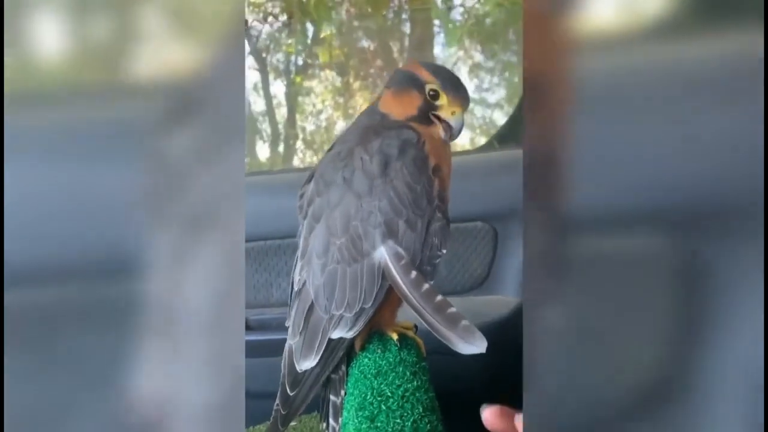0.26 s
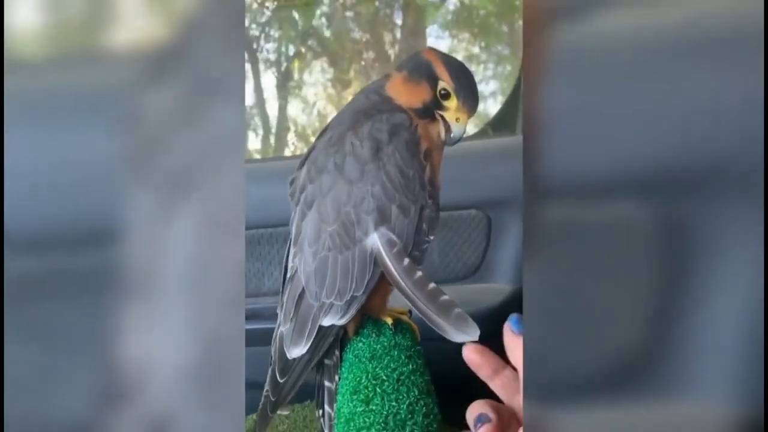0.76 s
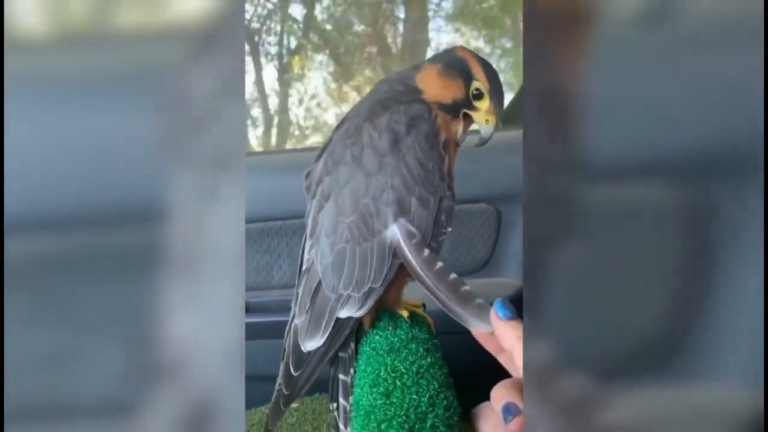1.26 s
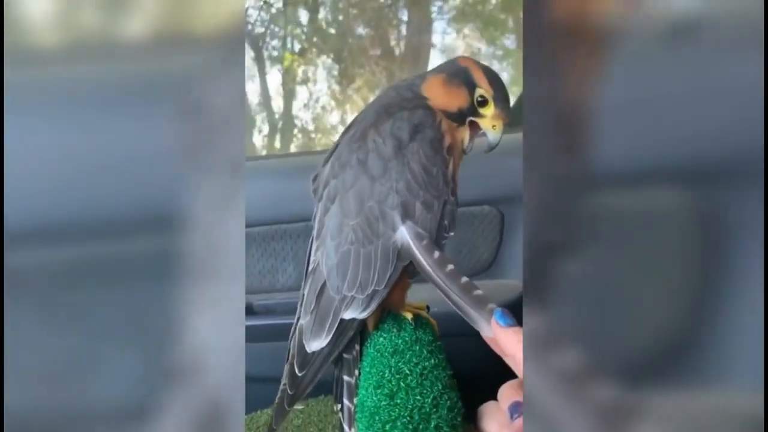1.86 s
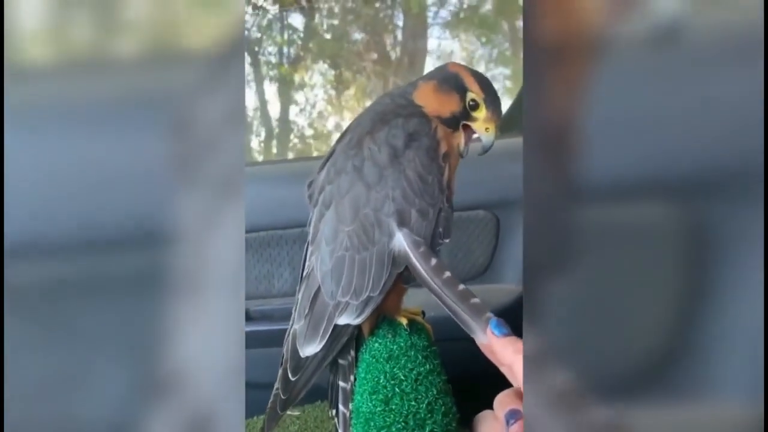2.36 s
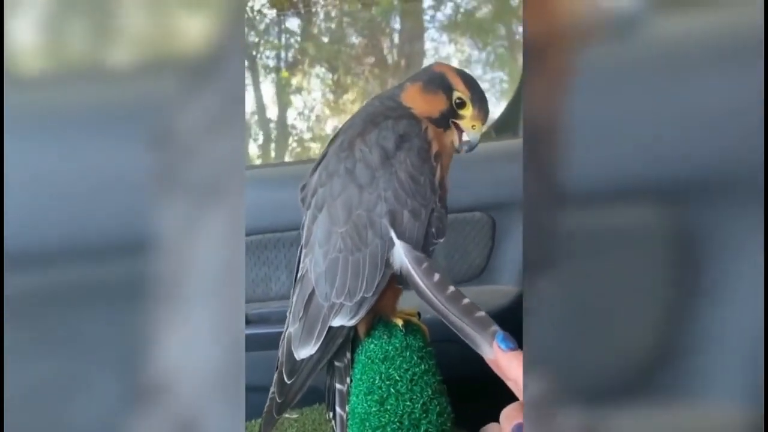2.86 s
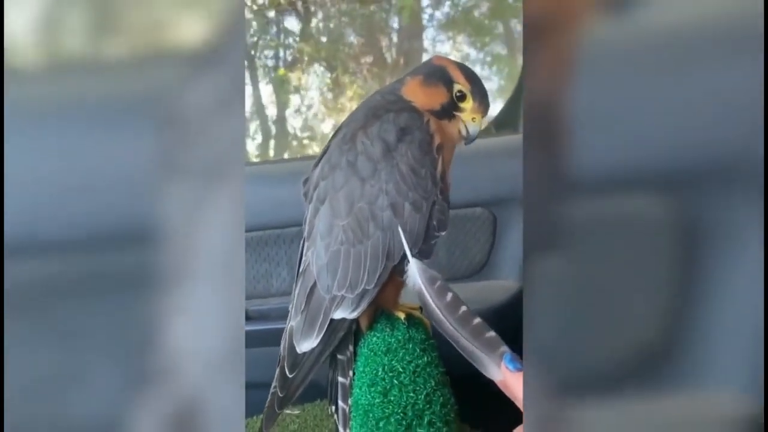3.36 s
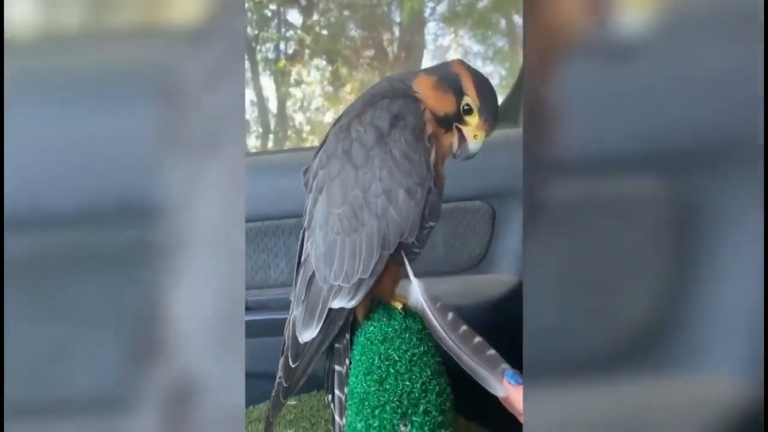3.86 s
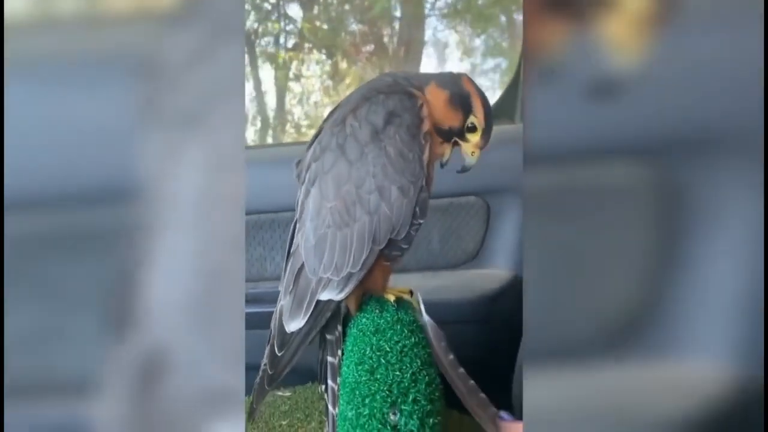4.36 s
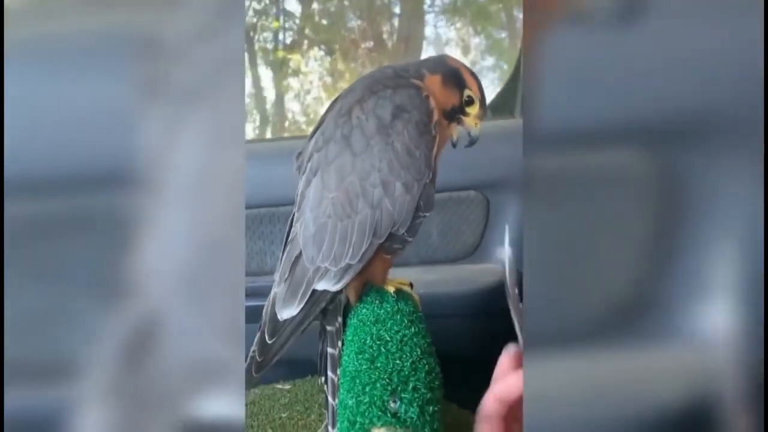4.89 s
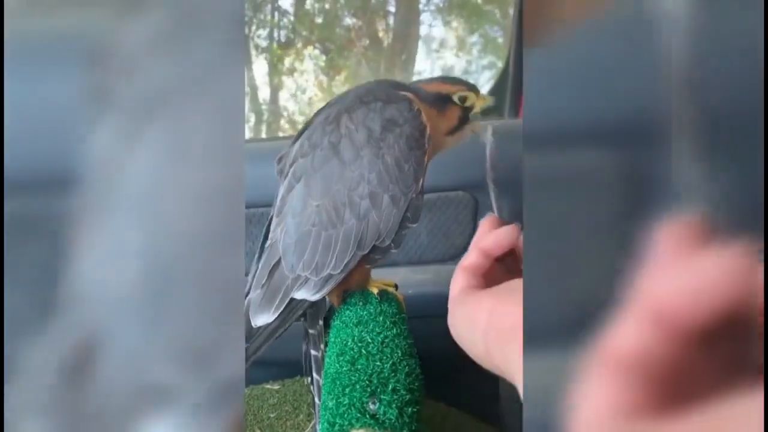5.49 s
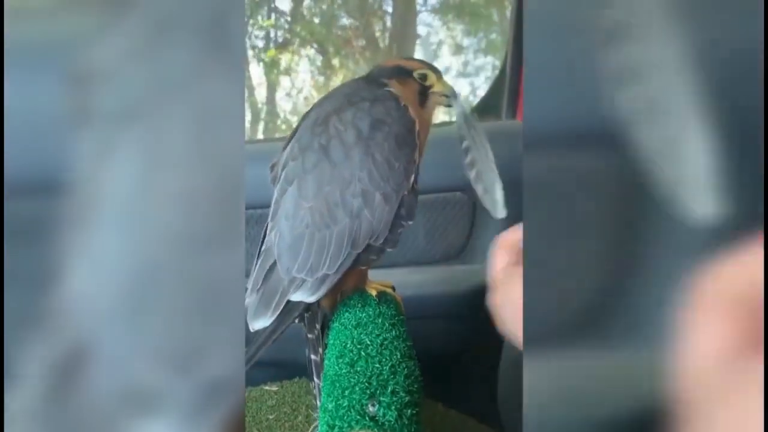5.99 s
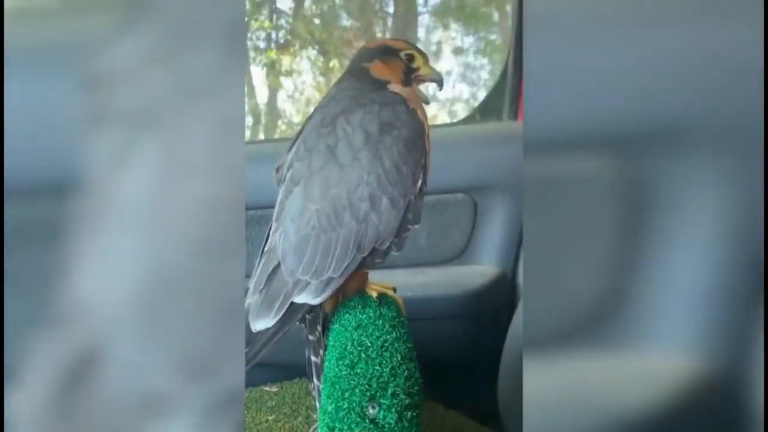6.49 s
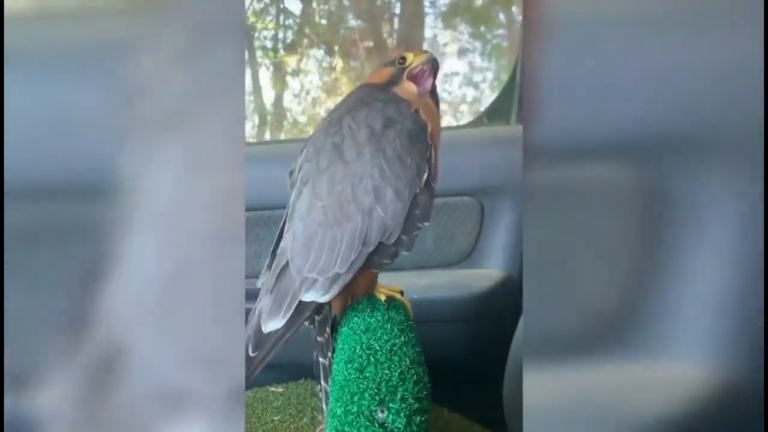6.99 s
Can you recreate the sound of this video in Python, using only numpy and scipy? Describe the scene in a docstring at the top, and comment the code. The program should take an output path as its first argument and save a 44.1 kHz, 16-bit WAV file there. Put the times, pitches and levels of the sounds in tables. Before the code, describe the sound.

A begging falcon's thin, piercing cries repeat at short intervals, each broken into quick swooping quavers. The sequence opens mid-call, with a barely audible thin whistle as that call stops, then little chirps lead into rising wails. Dull bumps sound occasionally. The close handheld phone pickup is direct and dry, with short reflections from glass and trim, and very quiet cabin rumble underneath. The last cry is strong.

```python
"""A small falcon begs close by in twelve wails: harmonic stacks on an arch of pitch, cut into swoops by catches.
Most calls follow a tiny chirp and grow louder; some break into a rasp of noise-modulated harmonics.
The bird sits on a perch inside a parked car: its voice arrives directly, off glass and off trim.
Soft knocks ring as decaying modes over a wavering low drone and a faint hiss of shaped noise.
A thin, steady-level whistle sounds once as the first call ends."""
import sys
import numpy as np
from scipy import signal
from scipy.fft import rfft, irfft
from scipy.io import wavfile
from scipy.ndimage import uniform_filter1d

SR = 44100
rng = np.random.default_rng(int(sys.argv[2]) if len(sys.argv) > 2 else 0)


def transcribe(signal):
    """Save signal, clipped to [-1, 1], as a 16-bit WAV file at the path in sys.argv[1]."""
    frames = np.atleast_2d(signal).T
    limited = np.clip(frames, -1, 1)
    pcm = np.round(limited * 32767).astype(np.int16)
    wavfile.write(sys.argv[1], SR, pcm)


N = 319310
TIME, FREQ = np.arange(N) / SR, np.arange(N // 2 + 1) * SR / N

# Harmonics 1 to 9 of the voice, before the resonances: level_db, share_of_brightness, share_of_gape
HARMONICS = [(-11, -1.04, 0.2), (-7, -1.335, 2), (-9.5, -0.92, 0.94), (-11.5, -0.22, 0.44),
             (-10, 0.17, 0.39), (-7.5, -0.21, -0.55), (-11.5, 0.29, 0.11), (-3.5, 0.5, -0.14),
             (-5.5, -.2, -.3)]


def undb(db):
    """Amplitude ratio: a gain of ten for every 20 decibels."""
    return 10 ** (np.asarray(db) / 20)


def unit(x):
    """Power normalization: scale to rms 1."""
    return x / np.sqrt(np.mean(x ** 2))


def wander(hz):
    """Band-limited random modulation: smoothed noise of spread 1, no faster than about hz."""
    step = int(SR / (2 * hz))
    held = np.repeat(rng.standard_normal(N)[:N // step + 1], step)
    ramped = uniform_filter1d(held, step)
    smooth = uniform_filter1d(ramped, step // 2 + 1)
    return unit(smooth[:N])


def ease(x):
    """Raised-cosine transition: a smooth step from 0 to 1 avoids clicks."""
    return np.sin(np.pi / 2 * np.clip(x, 0, 1)) ** 2


def harmonic_stack(hz, gains):
    """Fourier synthesis: harmonics of one pitch share a phase, each with its own rms gain."""
    phase = 2 * np.pi * np.cumsum(hz) / SR
    return np.sqrt(2) * sum(gain * np.sin((k + 1) * phase) for k, gain in enumerate(gains))


def reflections(t60):
    """Exponential reverberant decay: spectrum of a dense, fading train of echoes with energy 1."""
    decay = np.exp(-np.log(1000) * np.minimum(TIME / t60, 10))
    echoes = unit(rng.standard_normal(N) * decay)
    return rfft(echoes) / np.sqrt(N)


def cabin(drift=.04, swell=0.6, side_hz=3500):
    """Frequency modulation and noise filtering: a wavering drone, and a hiss that swells with it."""
    # Level of the drone over time: time_s, level_db
    drone_levels = [(0.0, -42.5), (0.4, -47), (0.84, -55.5), (0.88, -50), (1.12, -62), (1.38, -52.5),
                    (2.12, -58.5), (2.24, -53), (2.6, -58.5), (3.16, -57), (3.26, -62.5), (3.36, -56.5),
                    (3.6, -63), (4.02, -44.5), (4.54, -62), (4.98, -50), (5.48, -53), (7.2, -50.0)]
    # Relative spectrum of the hiss: frequency_hz, density_db (per Hz)
    air_spectrum = [(25, -34.5), (50, -8.5), (90, 6), (140, -16), (300, -19.5), (440, -7.5), (530, -22.5),
                    (620, -10.5), (1000, -24), (2500, -31.5), (5000, -38.5), (8200, -23), (10000, -29.5),
                    (13000, -30)]
    drone_hz, mean_air_db = 49.7, -57
    db = np.interp(TIME, *np.transpose(drone_levels))
    unsteady_db = 2.2 * wander(6)
    drone_pitch = drone_hz * (1 + drift * wander(3.3))
    drone = harmonic_stack(drone_pitch, [undb(db + unsteady_db)])

    hz, density_db = np.transpose(air_spectrum)
    colour = undb(np.interp(np.log(FREQ + 1), np.log(hz), density_db)) * ease(FREQ / hz[0])
    mid, side = rfft(rng.standard_normal((2, N))) * colour
    # the hiss's side part shrinks below side_hz, so its bass is nearly the same on both sides
    side = side * np.minimum(FREQ / side_hz, 1) ** 2
    air = unit(irfft(np.array([mid + side, mid - side]), N))
    return drone + air * undb(mean_air_db + swell * (db - db.mean()))


def whistle(centre_s=0.178, length_s=0.21, hz=4100, db=-72):
    """Pure-tone radiation: one faint sinusoid of slightly unsteady pitch, as the first call ends."""
    envelope = ease(2 - 4 * np.abs(TIME - centre_s) / length_s)
    return harmonic_stack(hz * (1 + .006 * wander(120)), [undb(db) * envelope])


def knocks(contact_s=0.012, damp_hz=560):
    """Modal impact response: padded blows give a brief thud, then the cabin's decaying boom."""
    # Soft knocks: time_s, peak_db
    knock_events = [(0.854, -46.5), (0.915, -52), (0.958, -47.5), (1.439, -47.5), (1.61, -29), (2.865, -43),
                    (2.881, -29), (3.11, -50), (3.758, -42), (3.791, -28), (3.812, -15), (5.507, -40.5),
                    (5.757, -37), (5.842, -39.5), (6.02, -43.5), (6.472, -40.5), (6.887, -40)]
    # Modes excited by a blow, relative levels before damping: frequency_hz, level_db, t60_s
    thud_modes = [(67, -12.5, 0.19), (137.2, 5.5, 0.031), (296.5, 4.5, 0.029), (396.6, 7, 0.032)]
    blows, t = np.zeros(N), TIME[:SR // 2]
    for s, db in knock_events:
        blows[int(s * SR)] += undb(db)
    ring = np.zeros(len(t))
    for hz, db, t60 in thud_modes:
        decay = np.exp(-np.log(1000) * t / t60)
        ring += undb(db) * np.sin(2 * np.pi * hz * t) * decay
    # a padded contact starts gradually and passes little treble
    padding = signal.butter(6, damp_hz, fs=SR, output="sos")
    ring = signal.sosfilt(padding, ring * ease(t / contact_s))
    return signal.fftconvolve(blows, ring / np.abs(ring).max())[:N]


def chirps(start_hz=1390, rise=0.076, length_s=0.042, fall_db=-7):
    """Spectral decay in a rising squeak: a bright, scratchy start leaves the lowest harmonics dominant."""
    # Chirps before calls, levels before envelope and resonances: start_s, treble_db, body_db, bright_s
    chirp_events = [(0.345, -41, -69, 0.0083), (1.032, -48, -66, 0.004), (1.637, -44.5, -56.5, 0.0037),
                    (2.285, -52.5, -56, 0.004), (2.932, -55.5, -62, 0.0059), (3.604, -56, -70, 0.0082),
                    (4.306, -50.5, -64, 0.018), (4.984, -55, -52, 0.015), (6.246, -61.5, -64.5, 0.014),
                    (6.89, -58, -48.5, 0.014)]
    out, scatter = np.zeros(N), .03 * wander(1100)
    for s, treble_db, body_db, bright_s in chirp_events:
        span = (TIME > s) & (TIME < s + length_s)
        t = TIME[span] - s
        body = undb(body_db) * np.sin(np.pi * t / length_s) * np.exp(-t / length_s)
        spark = t / bright_s * np.exp(1 - (t / bright_s) ** 2)
        gains = []
        for k, (level_db, *_) in enumerate(HARMONICS):
            gains.append(body * undb(fall_db * k) + spark * undb(treble_db + level_db))
        pitch = start_hz * (1 + rise * t / length_s + (spark + .1) * scatter[span])
        out[span] += harmonic_stack(pitch, gains)
    return out


def gesture(call, t):
    """Coupled vocal control: effort moves level, brightness and gape along an arch broken by catches.

    Returns pitch in Hz, level, brightness and gape in dB, and the release from 0 to 1.
    """
    # The voice catches, then swoops up again; accent and extra gape belong to the next swoop:
    # time_s, pitch_drop_hz, accent_db, extra_gape_db
    catch_events = [(0.019, 64, 3.5, -0.5), (0.094, 47, 7.5, -4.5), (0.499, 8, 8, 5.5),
                    (0.624, 82, -1, 1.5), (0.7, 84, -3.5, 2), (1.172, 36, 2, -6.5), (1.242, 56, 2, -6.5),
                    (1.322, 55, -2, 0), (1.782, 48, -5, -1), (1.855, 44, -3, -5), (1.925, 43, -4, -6.5),
                    (2.423, 28, -2, -0.5), (2.496, 69, 2.5, -7.5), (2.573, 52, -0.5, -2),
                    (3.066, 30, 4, -1.5), (3.146, 68, 4, -0.5), (3.223, 84, -4.5, 2.5),
                    (3.817, 18, -1, 2.5), (3.888, 76, -2.5, 3), (3.981, 65, -8, 0.5), (4.443, 25, 3, -7),
                    (4.507, 14, 6, -6.5), (4.578, 34, 3.5, -1), (4.67, 50, -1, -2.5), (5.11, 32, -0.5, 0),
                    (5.187, 74, 0.5, 0.5), (5.27, 87, 0.5, -0.5), (5.348, 94, 2.5, -3),
                    (5.668, 128, 3.5, 1), (5.756, 39, 6, 3), (5.836, 61, 1.5, 3), (5.909, 33, -5.5, 0.5),
                    (5.988, 92, -10, -0.5), (6.386, 28, 3.5, -6), (6.45, 69, 0.5, -9.5),
                    (6.526, 53, 1, -10), (7.043, 59, 2.5, -4), (7.108, 67, -2.5, -6.5),
                    (7.19, 37, -3.5, -6)]
    catch_s, catch_db_per_hz = .017, 0.0837  # half length; a deeper catch weakens the voice more
    onset_s, onset_db, scoop = 0.033, 5, 0.0339  # starts soft, and flat by this share of the pitch
    release_s, release_db, sag = 0.0571, 37, .09  # dies away and sags by this share as the air runs out
    bright_per_db, gape_per_db = 0.8818, 0.263  # effort brightens the voice and opens the beak
    slew_s = 0.022  # time to go from one swoop's accent to the next

    start, end, hz0, hz_mid, hz1, db0, db1, bright0, bright1, gape0, gape1, _ = call
    along = np.clip((t - start) / (end - start), 0, 1)
    onset = np.exp(-np.maximum(t - start, 0) / onset_s)
    ending = ease(1 - (end - t) / release_s)
    drop, accent, wider = np.zeros((3, len(t)))
    for s, drop_hz, accent_db, gape_db in catch_events:
        if start < s < end:
            after = ease((t - s) / slew_s + .5)
            drop = drop + drop_hz * np.exp(-((t - s) / catch_s) ** 2)
            accent = accent + after * (accent_db - accent)
            wider = wider + after * (gape_db - wider)
    arch = np.polyval(np.polyfit([0, .5, 1], [hz0, hz_mid, hz1], 2), along)
    effort = accent - catch_db_per_hz * drop - onset_db * onset - release_db * ending ** 2
    pitch = arch * (1 - scoop * onset - sag * ending) - drop
    level = db0 + (db1 - db0) * along + effort
    bright = bright0 + (bright1 - bright0) * along + bright_per_db * effort
    gape = gape0 + (gape1 - gape0) * along + gape_per_db * effort + wider
    return pitch, level, bright, gape, ending


def calls(flutter_db=2.0, swell_db=2.0):
    """Frequency and amplitude modulation of harmonics: wails fray as pitch sags and the air runs out."""
    # Calls, each along an arch of pitch; levels are before effort, harmonic levels and resonances:
    # start_s, end_s, start_pitch_hz, middle_pitch_hz, end_pitch_hz, start_level_db, end_level_db,
    # start_brightness_db, end_brightness_db, start_gape_db, end_gape_db, third_harmonic_ring_db
    call_events = [(0, 0.127, 1620, 1602, 1653, -32, -43, -4, -6, -1, 8.5, -4),
                   (0.435, 0.806, 1563, 1621, 1602, -53.5, -23.5, -7.5, 22.5, 2, 1, -5.5),
                   (1.118, 1.428, 1515, 1580, 1575, -52.5, -29.5, -2, 9, -8.5, 4, 3),
                   (1.718, 2.038, 1549, 1595, 1642, -41.5, -25.5, 1, 23, -2, 8, 2),
                   (2.343, 2.692, 1551, 1632, 1667, -45, -30.5, 2.5, 19.5, -2, 0.5, 1),
                   (3.005, 3.335, 1546, 1640, 1627, -55, -27, -1.5, 25.5, -3, -2.5, -0.5),
                   (3.666, 4.09, 1597, 1592, 1537, -47, -18, 8, 16.5, -14.5, 7, 9),
                   (4.356, 4.769, 1509, 1650, 1675, -54.5, -25.5, -5, 15.5, -5, -4, -2),
                   (5.037, 5.456, 1650, 1689, 1698, -49.5, -34, -3.5, 10.5, -2.5, 8, 9),
                   (5.612, 6.043, 1338, 1517, 1538, -52.5, -23.5, -10, 18.5, -6.5, 2.5, -9),
                   (6.313, 6.634, 1377, 1556, 1625, -59, -40.5, -7, 6, -0.5, 17.5, 2.5),
                   (6.937, 7.329, 1621, 1614, 1565, -44.5, -12.5, -2, 22.5, -0.5, 16.5, 5)]
    # The voice breaks up: centre_s, half_length_s, roughness (dimensionless)
    rasp_events = [(2.017, 0.027, 0.015), (2.666, 0.014, 0.025), (3.31, 0.011, 0.012), (4.053, 0.02, 0.072),
                   (4.763, 0.012, 0.022), (5.26, 0.057, 0.0017), (5.855, 0.33, 0.0037),
                   (5.819, 0.014, 0.014), (5.883, 0.0069, 0.068), (5.963, 0.0067, 0.072),
                   (6.326, 0.047, .007)]
    edge_s, grain_db = .008, 1.4  # fade at each edge; fast flutter of single harmonics
    waver, jitter = .0025, .0018  # slow and fast pitch scatter, as shares of the pitch
    loose, torn, shaky = .024, .085, .7  # release roughness; fraying scale; pitch scatter per roughness

    out, drift, scatter = np.zeros(N), wander(110), wander(380)
    rasp = sum(size * np.exp(-((TIME - s) / length) ** 2) for s, length, size in rasp_events)
    # the harmonics flutter together, and each flutters and swells on its own
    shared_flutter = flutter_db * wander(60)
    own_flutter = np.array([grain_db * wander(130) + swell_db * wander(14) for _ in HARMONICS])
    flutter = shared_flutter + own_flutter
    turbulence = np.array([wander(330) for _ in HARMONICS])
    number = np.arange(len(HARMONICS))[:, None] + 1
    third = number == 3
    for call in call_events:
        start, end, *_, ring_db = call
        span = (TIME > start - edge_s / 2) & (TIME < end + edge_s / 2)
        t = TIME[span]
        hz, db, bright, gape, ending = gesture(call, t)
        rough = loose * ending ** 2 + rasp[span]
        hz = hz * (1 + waver * drift[span] + (jitter + shaky * rough) * scatter[span])
        # a rough voice trades tone for a noisy skirt, the upper harmonics first
        fray = np.tanh(number * rough / torn)
        skirt = np.sqrt(1 - fray ** 2) + fray * turbulence[:, span]
        gate = ease((t - start) / edge_s + .5) * ease((end - t) / edge_s + .5)
        steady = np.array([db + base + b * bright + g * gape for base, b, g in HARMONICS])
        steady = steady + ring_db * third
        out[span] += gate * harmonic_stack(hz, undb(steady + flutter[:, span]) * skirt)
    return out


def falcon(trim_db=-6.5):
    """Source, filter and multipath: the voice meets two ports directly, off glass and dully off trim."""
    # Peaks and dips on the way from throat to microphone: centre_hz, width_hz, gain_db
    voice_resonances = [(1540.5, 88, 11.5), (3187, 57, 6.5), (4673, 280, 12), (7550, 858, -34.5),
                        (8124, 455, 15.5), (8505, 1590, 10), (11330, 990, 1), (13260, 1280, -32.5)]
    # Phase lead of the left microphone port over the right: frequency_hz, lead_rad
    port_lead = [(1600, 0.32), (3200, 1.58), (4700, 2.748), (6400, 6.46), (8100, 7.65), (10200, 9.59),
                 (12000, 12.4)]
    glass_db, glass_t60, trim_t60, dull_hz = -16, .035, .05, 7000  # decay times in s
    colour_db = sum(db / (1 + (2 * (FREQ - hz) / width) ** 2) for hz, width, db in voice_resonances)
    voice = rfft(calls() + chirps()) * undb(colour_db)
    lead = np.interp(FREQ, *np.transpose(port_lead))
    glass = undb(glass_db) * reflections(glass_t60)
    # half the phase lead goes to each port, with opposite signs
    near = (1 + glass) * np.exp(.5j * np.array([lead, -lead]))
    trim = np.array([reflections(trim_t60) for _ in range(2)])
    far = undb(trim_db) * trim / np.sqrt(1 + (FREQ / dull_hz) ** 2)
    # the paths are kept to a tenth of a second, with a little lead-in for the nearer port
    lead_in = 64  # samples
    paths = np.roll(irfft(near + far, N), lead_in, axis=1)[:, :SR // 10]
    heard = signal.fftconvolve(irfft(voice, N)[None], paths, axes=1)
    return heard[:, lead_in:N + lead_in]


def scene():
    """Linear superposition: the pressures of bird, knocks, cabin and whistle add."""
    return falcon() + knocks() + cabin() + whistle()


def record(dry):
    """Band limitation: the phone cuts the top with a steep elliptic low-pass."""
    top_hz = 13000
    lowpass = signal.ellip(8, .2, 70, top_hz, fs=SR, output="sos")  # ripple and stopband in dB
    return signal.sosfilt(lowpass, dry)


dry = scene()
out = record(dry)
transcribe(out)
```